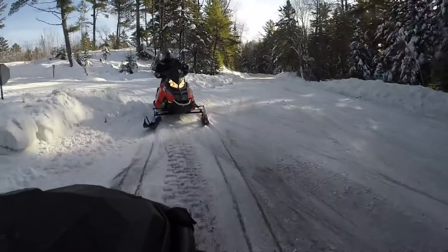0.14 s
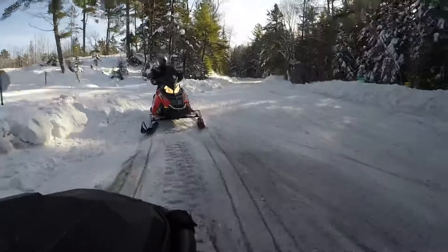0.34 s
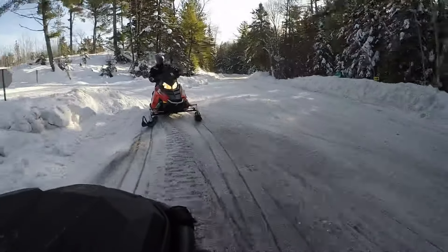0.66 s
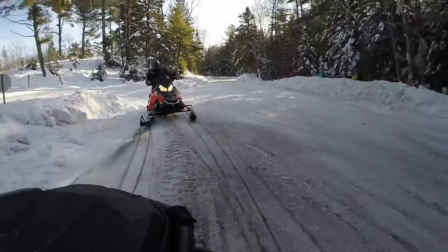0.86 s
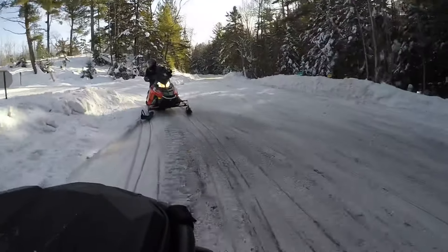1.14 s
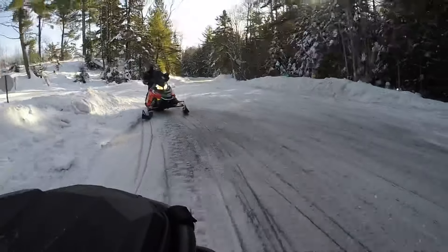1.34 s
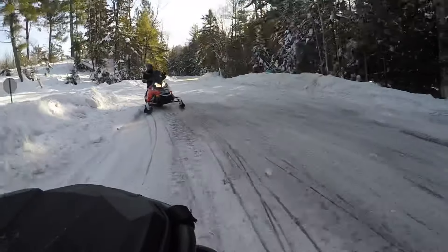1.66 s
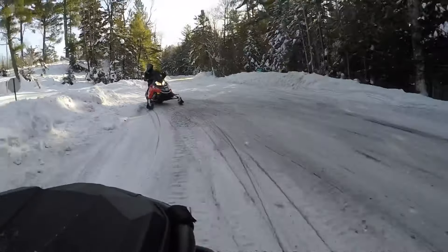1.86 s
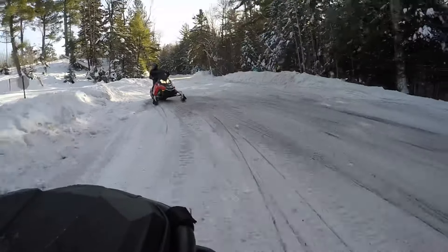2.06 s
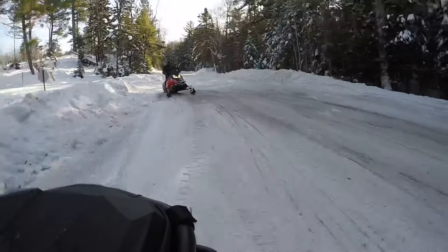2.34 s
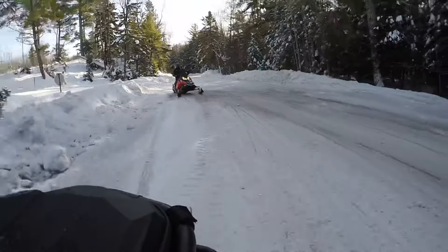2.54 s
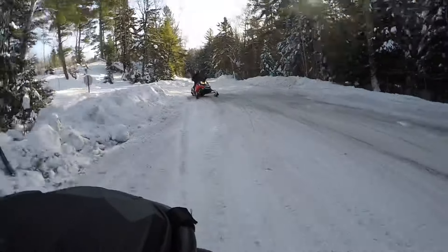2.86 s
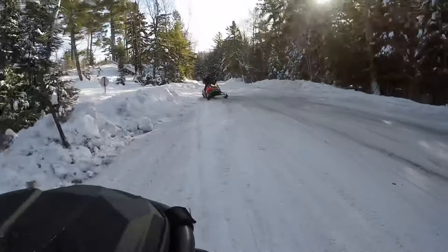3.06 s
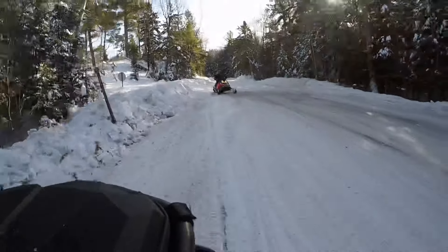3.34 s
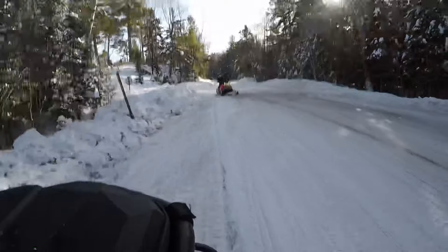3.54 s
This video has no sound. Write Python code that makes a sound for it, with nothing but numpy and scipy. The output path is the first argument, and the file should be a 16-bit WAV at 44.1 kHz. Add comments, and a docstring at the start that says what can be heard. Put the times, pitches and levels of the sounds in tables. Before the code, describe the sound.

A snowmobile drones steadily on a packed snow trail, heard from a loose mount on its tail. Fast knocking opens, the engine swells and drops near two seconds, then rattling clacks and a falling whine follow.

```python
"""A snowmobile cruises along a packed trail, heard at a loose camera mount on its tail.
Throughout, sine tones make the engine and track, and filtered noise makes the rumble and the rush of snow.
At first the shaking frame knocks the mount, with noise bursts twice a cycle; then the mount mostly buzzes with the
engine, which swells until 1.9 s and drops. Loud single clacks of the mount come from 0.4 to 3.1 s; lumps of snow
strike at 1.3 and 2.0 s. A panel rings from 2.2 s; from 3 s the drive's narrow-band whine sinks, the knocks return."""
import sys
import numpy as np
from scipy import signal
from scipy.fft import rfft, irfft
from scipy.io import wavfile
from scipy.ndimage import uniform_filter1d, minimum_filter1d

SR = 44100
rng = np.random.default_rng(int(sys.argv[2]) if len(sys.argv) > 2 else 0)


def master(y):
    """Save y as 16-bit WAV."""
    cut = np.clip(np.atleast_2d(y).T, -1, 1)
    pcm = np.round(cut * 32767)  # scale
    wavfile.write(sys.argv[1], SR, pcm.astype(np.int16))


N = 163170
T = np.arange(N) / SR


def undb(db):
    """Logarithmic level: decibels to amplitude gain."""
    return 10 ** (np.asarray(db) / 20)


def curve(table, axis=1):
    """Linear interpolation: one column of a table, joined by straight lines in time."""
    rows = np.array(table, float)
    return np.interp(T, rows[:, 0], rows[:, axis])


def unit(x):
    """Normalization: scale to rms 1."""
    return x / np.sqrt(np.mean(x ** 2))


def noise():
    """White noise: independent normal samples of spread 1."""
    return rng.standard_normal(N)


def walk(rate):
    """Low-pass random drift: random steps at a rate per second, averaged twice, with rms 1."""
    step = int(SR / rate)
    steps = np.repeat(rng.standard_normal(N // step + 1), step)
    return unit(uniform_filter1d(uniform_filter1d(steps, step), step)[:N])


def turns(hz):
    """Phase accumulation: cycles completed at a moving rate."""
    return np.cumsum(hz) / SR


def colour(x, points):
    """Minimum-phase filtering: a causal filter through (Hz, dB) points; white noise keeps its level."""
    hz, db = np.array(points, float).T
    log_hz = np.log(np.fft.rfftfreq(2 * N, 1 / SR) + 1)
    gain = unit(undb(np.interp(log_hz, np.log(hz), db)))
    # folding the cepstrum onto positive time makes the filter causal
    cepstrum = irfft(np.log(gain))[:N]
    response = np.exp(2 * rfft(cepstrum, 2 * N) - cepstrum[0])
    return irfft(rfft(x, 2 * N) * response)[:N]


def ring(x, modes):
    """Modal resonance: twice-filtered modes, each driven by x at a random delay; rms 1."""
    out = 0
    for hz, width, db in modes:
        b, a = signal.iirpeak(hz, hz / (1.33 * width), fs=SR)
        drive = np.roll(x, rng.integers(SR // 100))
        out = out + undb(db) * signal.lfilter(b, a, signal.lfilter(b, a, drive))
    return unit(out)


def narrow(hz, flutter_hz):
    """Quadrature modulation: noise gathered round a moving pitch; faster flutter widens it."""
    angle = 2 * np.pi * turns(hz)
    return unit(walk(flutter_hz) * np.sin(angle) + walk(flutter_hz) * np.cos(angle))


def knocks(cycle, decay_s, scatter_db, jitter_s):
    """Periodic impact: one short plastic knock a cycle, uneven in time and force; rms 1."""
    at = np.flatnonzero(np.diff(np.floor(cycle)) > 0)
    timing, force = rng.standard_normal((len(at), 2)).T
    hits = np.zeros(N)
    places = (at + jitter_s * SR * timing).astype(int) % N
    np.add.at(hits, places, undb(scatter_db * np.clip(force, -2, 1)))
    bursts = signal.lfilter([1], [1, -np.exp(-1 / (decay_s * SR))], hits)
    return unit(uniform_filter1d(bursts, size=48) * noise())


def blows(table, decay_s):
    """Exponential decay: noise bursts that start at once and die away, one for each row."""
    envelope = sum(undb(db) * (T >= s) * np.exp(-np.abs(T - s) / decay_s) for s, db in table)
    return envelope * noise()


# Harmonics of the engine. Each row: multiple of the firing rate, relative level in dB.
ENGINE_HARMONICS = [(.5, 3), (1, -1), (1.5, -17), (2.5, -15.5), (3, -14.5)]
# Loudness of the engine. Each row: time in seconds, rms level in dB.
ENGINE_LEVEL = [(0, -31.5), (.85, -27.5), (1.5, -23), (1.85, -21), (2.0, -31), (2.5, -32), (3.1, -34.5),
                (3.7, -41)]
ORDER_DRIFT_DB = 3.55


def engine(firings):
    """Harmonic synthesis: the firing tone and the crank's half orders, each a little unsteady."""
    tone = 0
    for order, db in ENGINE_HARMONICS:
        partial = np.sin(2 * np.pi * (order * firings + rng.random()))
        tone = tone + undb(db + ORDER_DRIFT_DB * walk(25.22)) * partial
    return unit(tone) * undb(curve(ENGINE_LEVEL))


# Drone of the track. Each row: time in seconds, mean pitch in Hz, level in dB.
TRACK_DRONE = [(0, 139.4, -19.5), (.15, 135.8, -17), (.3, 134.2, -25.5), (.45, 133.3, -25),
               (.55, 135.3, -15.5), (.78, 139.3, -15), (.92, 133.2, -18), (1.1, 138.4, -15),
               (1.45, 134.7, -18), (1.57, 132.5, -25.5), (1.78, 137.4, -15.5), (2.0, 138, -29),
               (2.25, 135, -14), (2.55, 136, -18.5), (2.7, 136.8, -25.5), (2.85, 139.4, -16.5),
               (3.12, 137.4, -31.5), (3.7, 136.6, -27)]
TRACK_ROUGH_DB, TRACK_SWAY = 3.2, .3  # random drift of level; depth of the throb
TRACK_JITTER, TRACK_JITTER_PER_DB = .018, .009  # share of the pitch; added share per dB of upset


def track(shakes, upset):
    """Modulation: the lugs beat a low note that throbs with the sway and breaks into a growl on rough ground."""
    jitter = (TRACK_JITTER + TRACK_JITTER_PER_DB * upset) * walk(70)
    cycle = turns(curve(TRACK_DRONE) * (1 + jitter))
    throb = 1 + TRACK_SWAY * np.sin(2 * np.pi * shakes)
    roughness = undb(TRACK_ROUGH_DB * walk(29.55))
    return unit(np.sin(2 * np.pi * cycle) * throb * roughness) * undb(curve(TRACK_DRONE, axis=2))


# Sway of the frame. Each row: time in seconds, mean rate in Hz, level in dB before faltering.
FRAME_SHAKE = [(0, 38.9, -10), (.22, 41.64, -10.5), (.42, 41.9, -10), (.55, 43.88, -21), (.63, 44.3, -14),
               (.76, 40.04, -19), (1.2, 39.17, -14.5), (1.35, 35.87, -17), (1.48, 29.35, -13.5),
               (1.72, 28.11, -23), (1.84, 41.12, -12.5), (2.05, 37, -17), (2.42, 41.93, -26.5),
               (2.7, 44.04, -18.5), (2.88, 46.16, -13.5), (3.05, 43.93, -13.5), (3.22, 41.83, -9),
               (3.42, 39.87, -9.5), (3.7, 36.3, -10.5)]
# Loudness of the frame's rumble. Each row: time in seconds, level in dB.
RUMBLE_LEVEL = [(0, -18), (.35, -25), (.55, -21), (.8, -17.5), (1.2, -18.5), (1.8, -16), (2.3, -14.5),
                (2.6, -14), (2.85, -17), (3.2, -19.5), (3.7, -27)]
# Spectrum of the rumble. Each row: frequency in Hz, relative density in dB per Hz.
RUMBLE_SPECTRUM = [(8, -5.5), (25, -3.5), (50, 1), (68, -1), (120, -0.5), (160, -3.5), (190, -12.5),
                   (240, -17), (350, -30), (1000, -100)]
SHAKE_CALM_DB = 6  # the sway falters when it stands less than this above the rumble
SHAKE_WANDER, SHAKE_ROUGH_DB = .025, 0.38  # share of the rate, and dB of level, per dB of upset


def frame(shakes, upset):
    """Forced vibration: the frame sways at its slow rate, falters on rough ground, and rumbles."""
    falter_db = SHAKE_ROUGH_DB * upset * walk(11)
    sway = unit(np.sin(2 * np.pi * shakes)) * undb(curve(FRAME_SHAKE, axis=2) + falter_db)
    rumble = colour(noise(), RUMBLE_SPECTRUM) * undb(curve(RUMBLE_LEVEL))
    return sway + rumble


# Chatter of the mount. Each row: time in seconds, knock level in dB before its sway bias,
# buzz level in dB before hiss and flutter.
MOUNT_CHATTER = [(0, -39, -49), (.22, -42, -47), (.37, -45.5, -49), (.42, -55, -50.5), (.72, -60, -51.5),
                 (.77, -56, -46.5), (.92, -58, -44), (1.15, -69, -45.5), (1.45, -61, -45),
                 (1.84, -63.5, -42.5), (1.92, -72, -46.5), (2.15, -60, -51.5), (2.18, -56, -44),
                 (2.45, -63, -41.5), (2.88, -62, -41), (3.05, -56, -50), (3.3, -43.5, -45), (3.7, -49, -56)]
# Ring of the mount. Each row: frequency in Hz, relative density in dB per Hz.
MOUNT_RING = [(500, 1.5), (1500, 0), (2500, 0), (3200, -14), (3800, 2), (4900, 5.5), (6400, -0.5),
              (7400, -6), (8900, -5), (10200, -22.5), (11400, -23), (12500, -11.5), (14000, -19),
              (15600, -33)]
# Ring of its hard knocks. Each row: frequency in Hz, relative density in dB per Hz.
KNOCK_RING = [(500, 5.5), (2500, -8), (3200, -6), (3750, -2.5), (4300, -2.5), (4700, 3), (5600, 5),
              (7400, -3), (8900, -7), (10600, -19), (12400, -14), (14500, -16), (15600, -25)]
# Loud single clacks of the mount. Each row: start in seconds, level in dB at onset before the mount's ring.
LOUD_CLACKS = [(.369, -30.5), (.406, -31), (.442, -36), (.516, -36.5), (1.074, -30), (1.147, -31),
               (1.171, -32.5), (1.277, -29), (1.582, -31.5), (1.640, -29), (2.072, -32.5), (2.200, -29),
               (2.262, -26), (2.293, -27.5), (2.420, -29), (2.591, -23.5), (2.645, -28), (2.710, -35),
               (2.843, -26.5), (3.125, -26)]
# Resonances of a panel. Each row: frequency in Hz, width in Hz (each filter stage is 1.33 times as wide),
# relative level in dB.
PANEL_MODES = [(2300, 290, -5), (4100, 810, -8.5)]
# Loudness of the panel. Each row: time in seconds, level in dB.
PANEL_LOUDNESS = [(0, -58), (2.12, -52.5), (2.2, -40.5), (2.55, -40), (2.88, -41.5), (3.1, -46),
                  (3.7, -53.5)]
BUZZ_PER_FIRING, KNOCK_LAG = .254, .03  # buzz strokes per firing; lag in sway cycles
REBOUND, BUZZ_HISS, PANEL_HISS = .5, .45, .55  # amplitudes relative to the buzz
SWAY_BIAS_DB = 1.5
KNOCK_DECAY_S, BUZZ_DECAY_S, CLACK_DECAY_S = .0016, .002, .0018


def mount(shakes, firings):
    """Impact excitation: the loose mount knocks twice a sway, buzzes on every fourth firing or so, and clacks."""
    sway = shakes - KNOCK_LAG
    knock = knocks(2 * sway, KNOCK_DECAY_S, scatter_db=1.2, jitter_s=.0003)
    knock = knock * undb(SWAY_BIAS_DB * np.cos(2 * np.pi * sway))  # harder one way
    strokes = BUZZ_PER_FIRING * firings
    buzz = knocks(strokes, BUZZ_DECAY_S, scatter_db=3.5, jitter_s=.0009)
    rebound = knocks(strokes + .5, BUZZ_DECAY_S, scatter_db=5, jitter_s=.003)
    buzz = unit(buzz + REBOUND * rebound)
    panel = ring(buzz + PANEL_HISS * noise(), PANEL_MODES) * undb(curve(PANEL_LOUDNESS))
    chatter = (buzz + BUZZ_HISS * noise()) * undb(1.2 * walk(24.01) + curve(MOUNT_CHATTER, axis=2))
    hard_knocks = colour(knock, KNOCK_RING) * undb(curve(MOUNT_CHATTER))
    return hard_knocks + colour(chatter + blows(LOUD_CLACKS, CLACK_DECAY_S), MOUNT_RING) + panel


# Whine of the drive, sinking as the sled eases off. Each row: time in seconds, mean pitch in Hz, level in dB.
DRIVE_WHINE = [(0, 1120, -42), (.35, 1098, -51.5), (.75, 1115, -52), (1.1, 1105, -43.5), (1.7, 1096, -41.5),
               (2.3, 1125, -41), (2.7, 1110, -49), (2.97, 1103, -37.5), (3.1, 1040, -41.5),
               (3.28, 940, -37.5), (3.45, 892, -43), (3.7, 847, -50)]
WHINE_FLUTTER_HZ, WHINE_SMEAR = 110, 0.366  # smear: random Hz per Hz below the highest pitch


def whine():
    """Narrow-band noise: a whine that smears out as its pitch sinks."""
    hz = curve(DRIVE_WHINE)
    smear = WHINE_SMEAR * (hz.max() - hz) * walk(90)
    return narrow(hz + smear, WHINE_FLUTTER_HZ) * undb(curve(DRIVE_WHINE, axis=2))


# Loudness of body and snow. Each row: time in seconds, boom level in dB, hollow roar level in dB, snow level in dB.
TRAIL_LEVELS = [(0, -29, -29.5, -31), (.2, -31, -39.5, -37.5), (.55, -29.5, -44, -41),
                (.68, -28.5, -45, -39), (.8, -31, -39, -38), (1.2, -27, -43, -34), (1.5, -27.5, -41, -35),
                (1.8, -22, -33, -34.5), (2.02, -30, -33.5, -34), (2.3, -25, -30.5, -32.5),
                (2.55, -26.5, -36, -33.5), (2.8, -26, -32, -33.5), (3.0, -27, -33, -33.5),
                (3.3, -29, -33, -35.5), (3.46, -34, -34.5, -38.5), (3.56, -27.5, -32, -41.5),
                (3.7, -37, -40, -45)]
# Boom of the body. Each row: frequency in Hz, relative density in dB per Hz.
BODY_BOOM = [(150, -14.5), (200, 1.5), (255, -1.5), (315, 3.5), (360, -9.5), (420, -1.5), (490, -10),
             (570, -27.5), (900, -44.5), (2000, -100)]
# Resonances of the roar. Each row: frequency in Hz, width in Hz (each filter stage is 1.33 times as wide),
# relative level in dB.
ROAR_MODES = [(404.7, 76, -0.5), (488, 90, -8.5)]
# Upper resonance of the body. Each row: time in seconds, mean centre in Hz, level in dB.
BODY_HOWL = [(0, 660.6, -31), (.3, 637.4, -42), (.8, 670, -40.5), (1.2, 665, -38), (1.8, 668.2, -34),
             (2.3, 675, -32), (2.7, 671.7, -34.5), (3.1, 655, -36), (3.4, 640, -34.5), (3.7, 635, -38)]
# Rush of the snow. Each row: frequency in Hz, relative density in dB per Hz.
SNOW_SPECTRUM = [(200, 2), (600, 0), (850, 3), (1250, 0.5), (1550, -3), (2000, -2.5), (2550, -3.5),
                 (2850, -11), (3250, -16.5), (3800, -11), (4500, -18), (6500, -13.5), (9000, -25.5),
                 (10200, -30), (11500, -35), (12500, -46), (15500, -48)]
# Lumps of snow that hit the body. Each row: start in seconds, level in dB at onset before their colour.
SNOW_LUMPS = [(1.28, -33.5), (2.002, -27)]
# Dull tock of the lumps. Each row: frequency in Hz, relative density in dB per Hz.
LUMP_SPECTRUM = [(700, -13), (1250, 5), (2450, -5.5), (3000, -20), (6000, -42)]
HOWL_WANDER, HOWL_FLUTTER_HZ = .015, 230  # share of the pitch; rate of flutter
SNOW_GRAIN_DB, LUMP_DECAY_S = 1, .007


def trail():
    """Broadband excitation: rushing snow sets the body booming, roaring and howling; lumps strike it."""
    boom = colour(noise(), BODY_BOOM) * undb(curve(TRAIL_LEVELS))
    roar = ring(noise(), ROAR_MODES) * undb(curve(TRAIL_LEVELS, axis=2))
    howl_hz = curve(BODY_HOWL) * (1 + HOWL_WANDER * walk(14))
    howl = narrow(howl_hz, HOWL_FLUTTER_HZ) * undb(curve(BODY_HOWL, axis=2))
    grains = noise() * undb(SNOW_GRAIN_DB * walk(400))
    snow = colour(grains, SNOW_SPECTRUM) * undb(curve(TRAIL_LEVELS, axis=3))
    lumps = colour(blows(SNOW_LUMPS, LUMP_DECAY_S), LUMP_SPECTRUM)
    return boom + roar + howl + snow + lumps


FIRING_HZ, FIRING_WANDER, FIRING_JITTER = 244.3, 0.002855, 0.01276  # mean rate; slow and fast shares of it


def scene():
    """Superposition: all parts share the firing and shaking cycles and add at one point."""
    firings = turns(FIRING_HZ * (1 + FIRING_WANDER * walk(3.08) + FIRING_JITTER * walk(120)))
    # dB by which the rumble crowds the sway
    upset = np.clip(curve(RUMBLE_LEVEL) - curve(FRAME_SHAKE, axis=2) + SHAKE_CALM_DB, 0, 10)
    shakes = turns(curve(FRAME_SHAKE) * (1 + SHAKE_WANDER * upset * walk(20)))
    machine = engine(firings) + track(shakes, upset) + whine()
    body = frame(shakes, upset) + mount(shakes, firings)
    return (machine + body + trail())[None]


LIMIT, LIMIT_HOLD_S, GAIN_DB = 0.69, 0.0082, 0.97  # peak before the low-pass; window; gain before the limiter
TOP_HZ, EDGE_S = 15700, .003  # low-pass edge; fade at each end


def record(dry):
    """Dynamic limiting: the ends are eased, a fast look-ahead limiter holds the peaks, and the top is cut."""
    ease = np.clip(np.minimum(T, T[-1] - T) / EDGE_S, 0, 1)
    loud = dry * undb(GAIN_DB) * ease
    hold = int(LIMIT_HOLD_S * SR)
    needed = LIMIT / np.maximum(np.abs(loud), LIMIT)
    gain = uniform_filter1d(minimum_filter1d(needed, hold), hold)
    low_pass = signal.ellip(8, .2, 80, TOP_HZ, fs=SR, output="sos")
    return signal.sosfilt(low_pass, loud * gain)


dry = scene()
out = record(dry)
master(out)
```